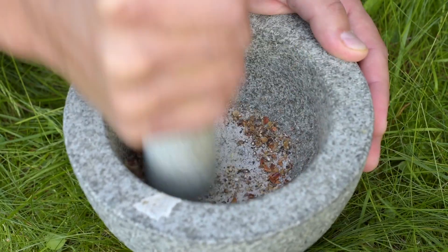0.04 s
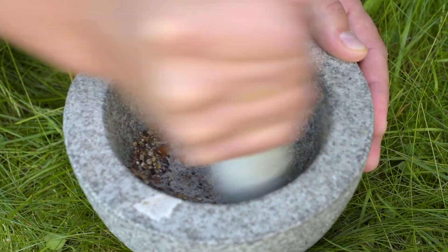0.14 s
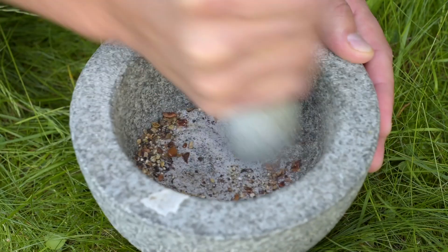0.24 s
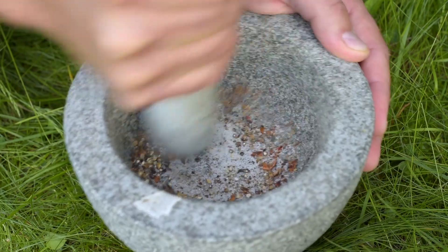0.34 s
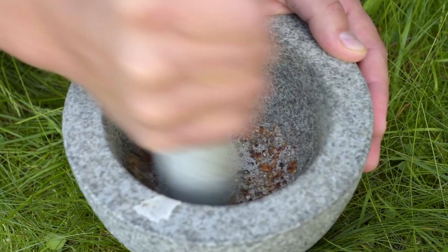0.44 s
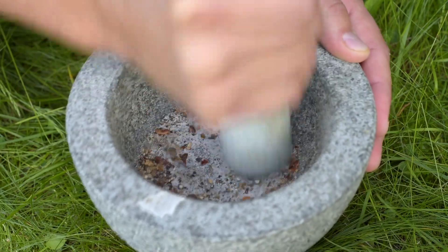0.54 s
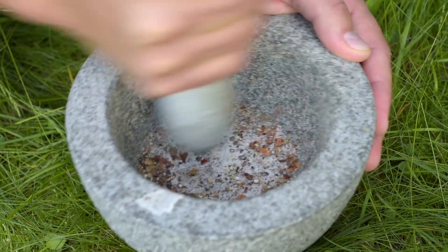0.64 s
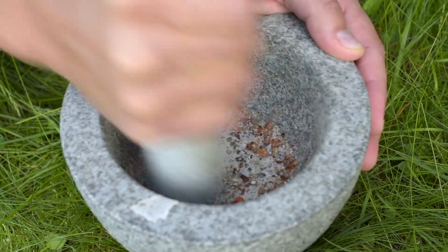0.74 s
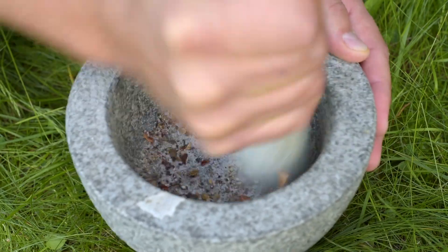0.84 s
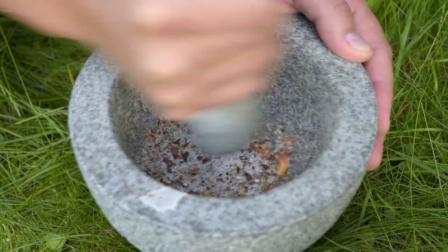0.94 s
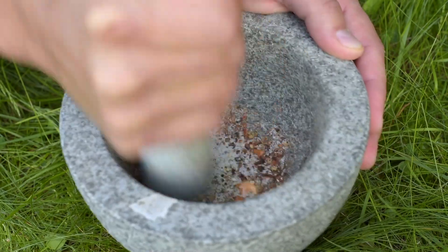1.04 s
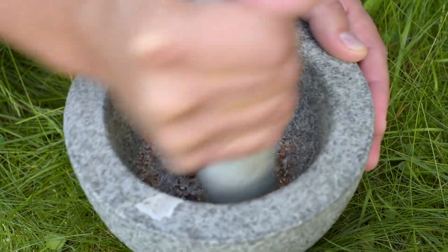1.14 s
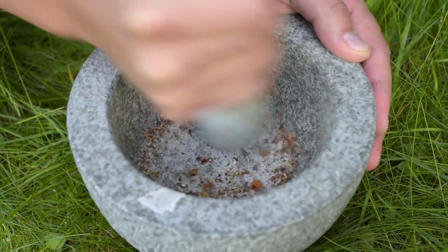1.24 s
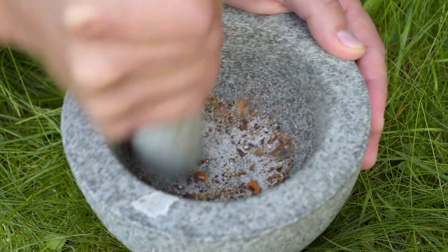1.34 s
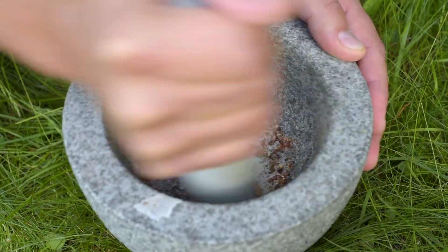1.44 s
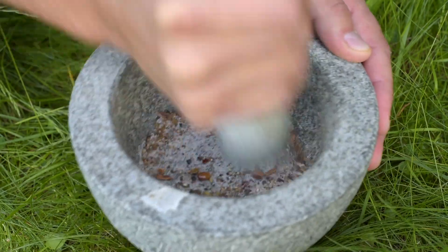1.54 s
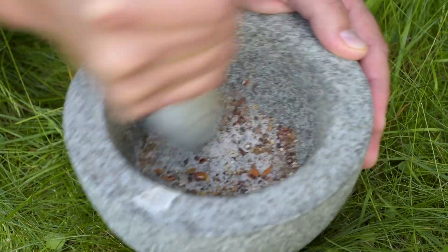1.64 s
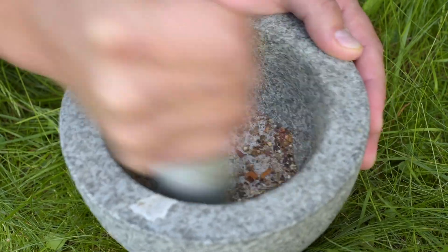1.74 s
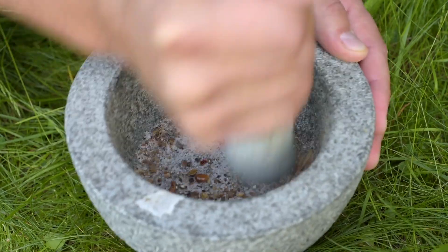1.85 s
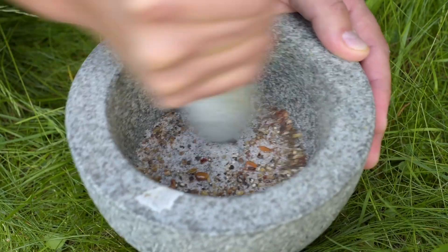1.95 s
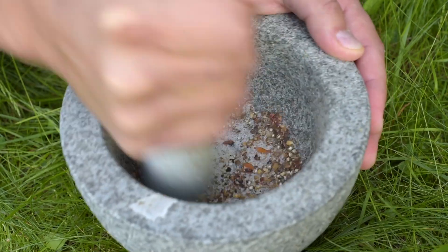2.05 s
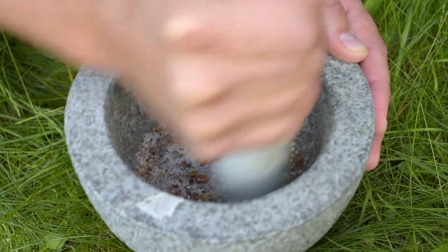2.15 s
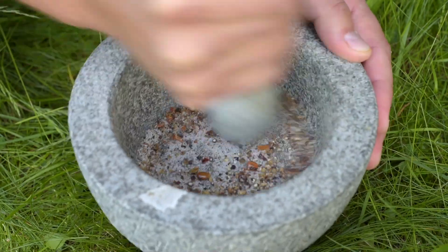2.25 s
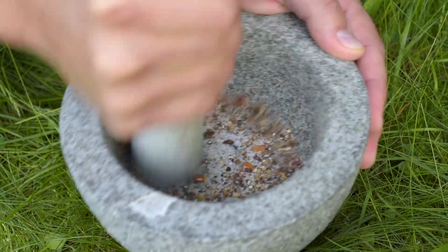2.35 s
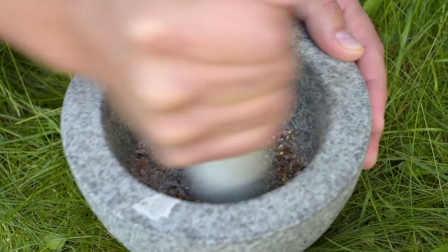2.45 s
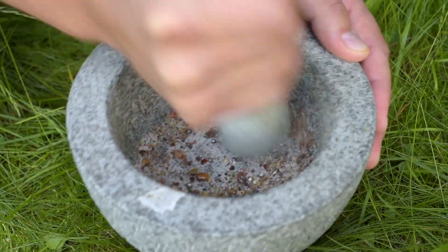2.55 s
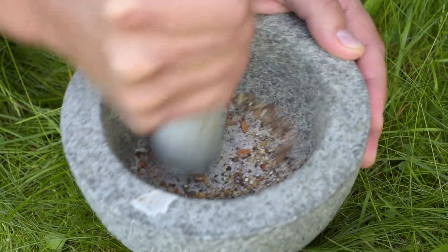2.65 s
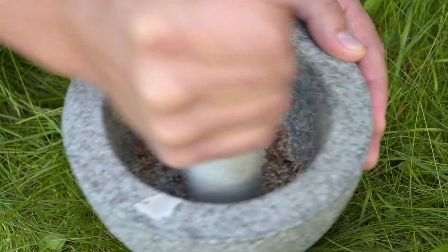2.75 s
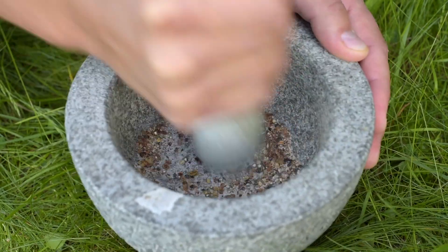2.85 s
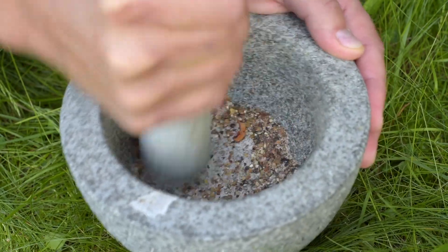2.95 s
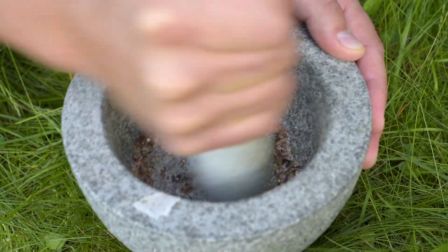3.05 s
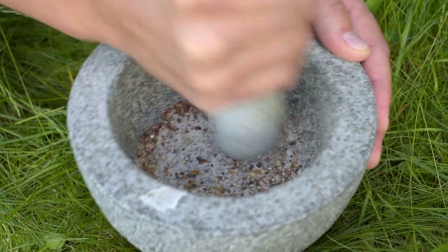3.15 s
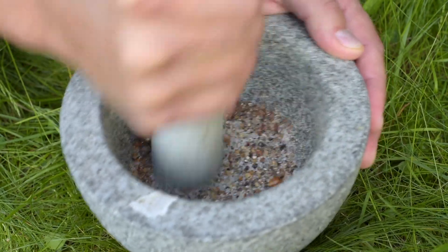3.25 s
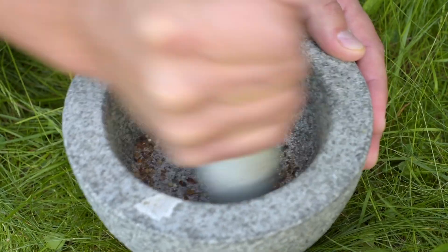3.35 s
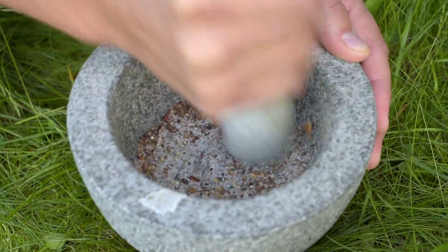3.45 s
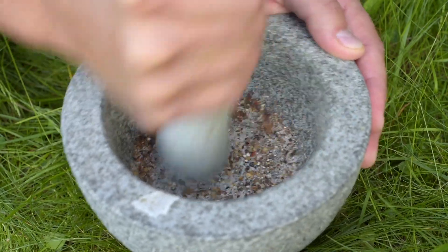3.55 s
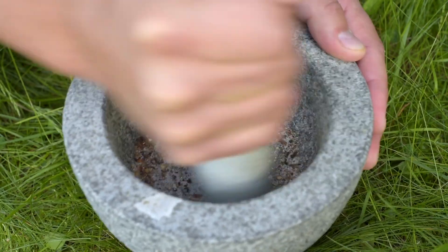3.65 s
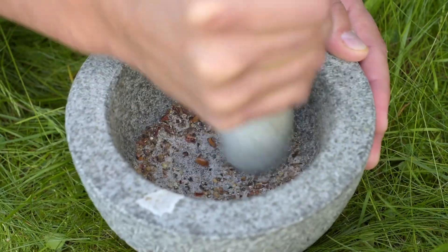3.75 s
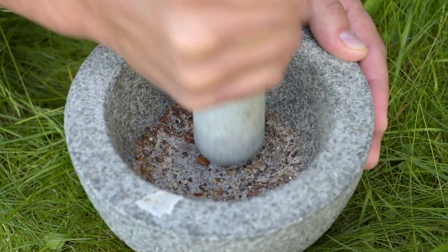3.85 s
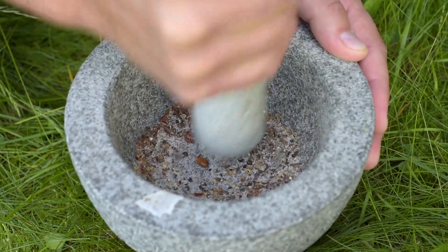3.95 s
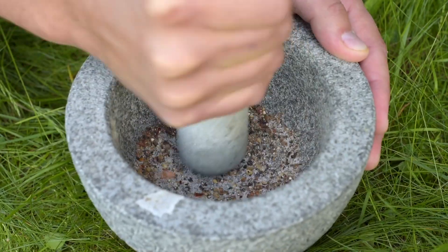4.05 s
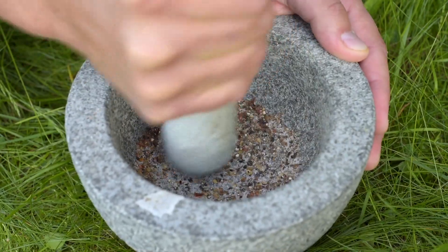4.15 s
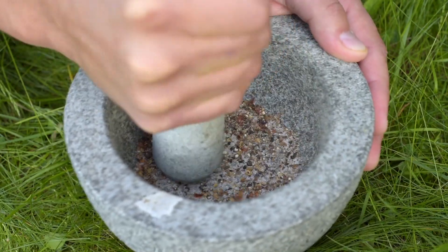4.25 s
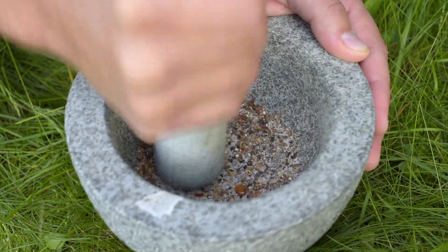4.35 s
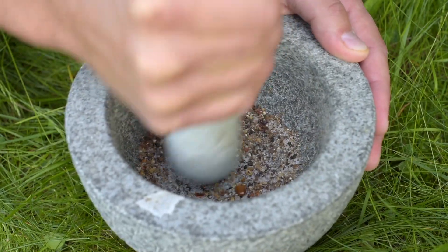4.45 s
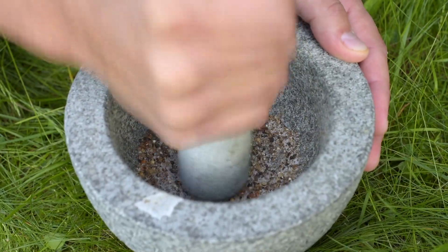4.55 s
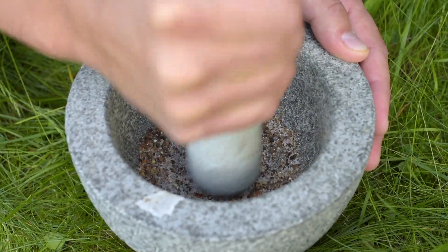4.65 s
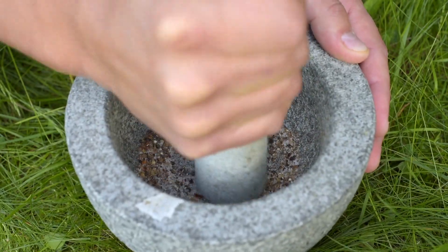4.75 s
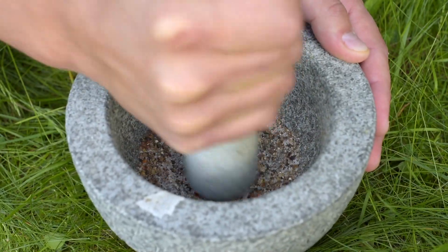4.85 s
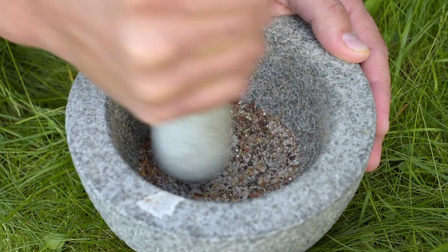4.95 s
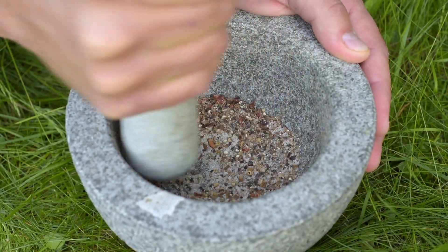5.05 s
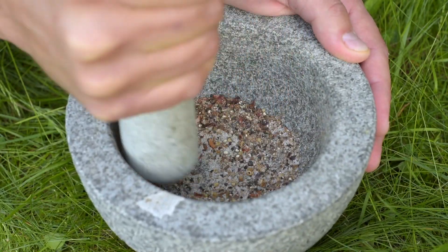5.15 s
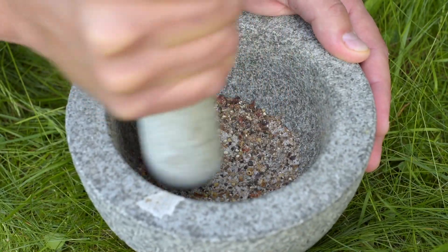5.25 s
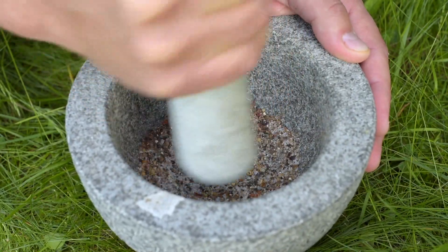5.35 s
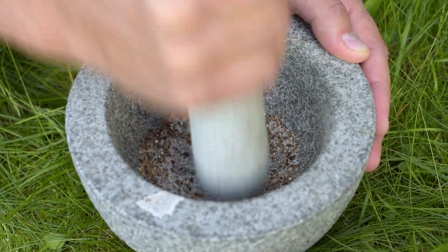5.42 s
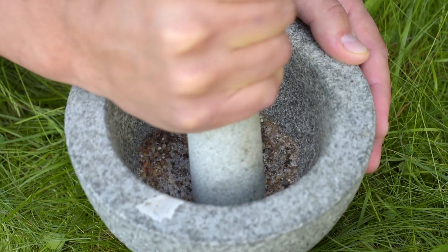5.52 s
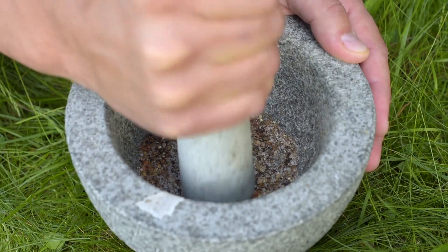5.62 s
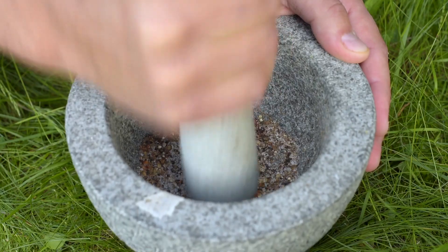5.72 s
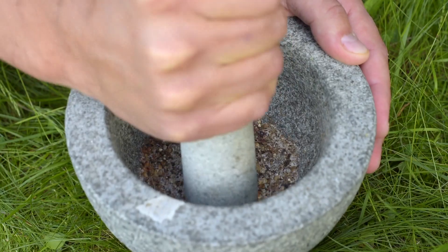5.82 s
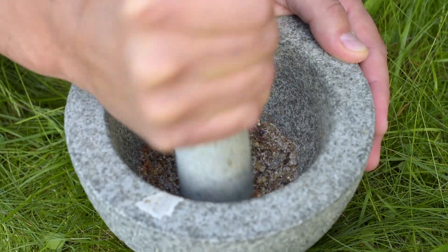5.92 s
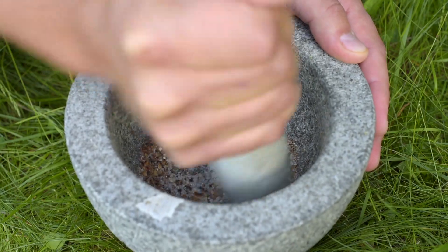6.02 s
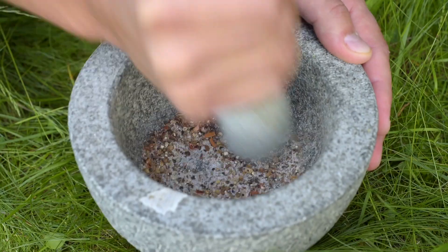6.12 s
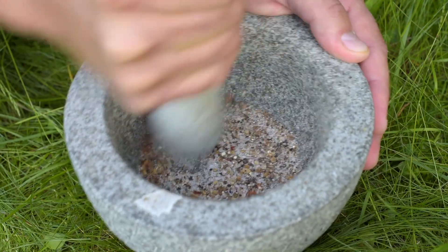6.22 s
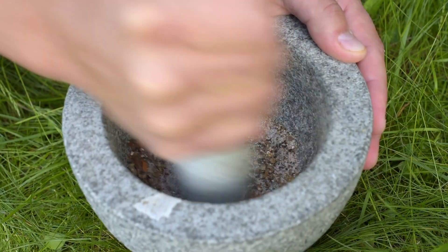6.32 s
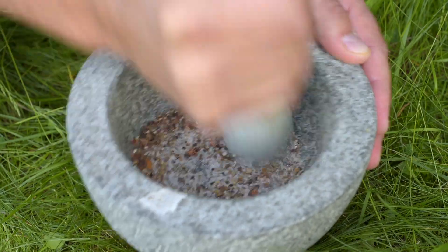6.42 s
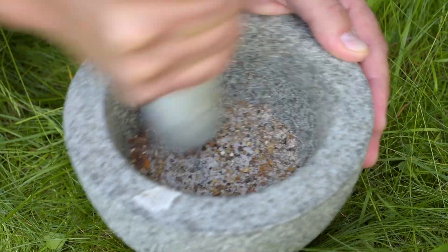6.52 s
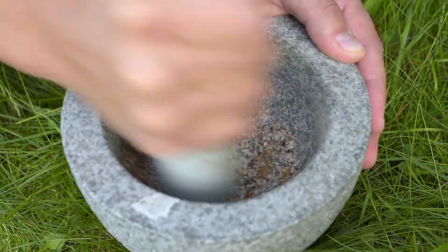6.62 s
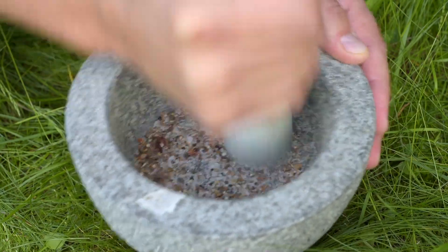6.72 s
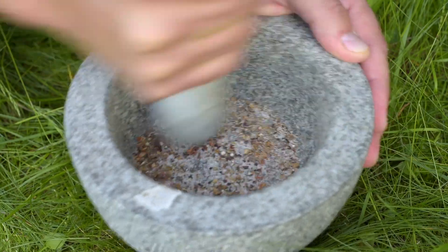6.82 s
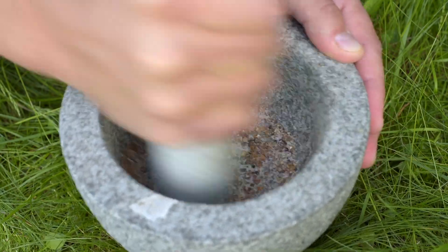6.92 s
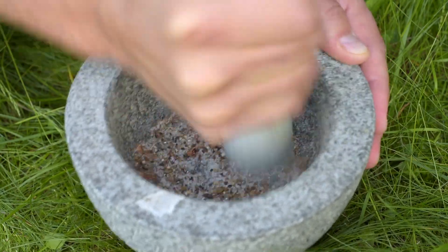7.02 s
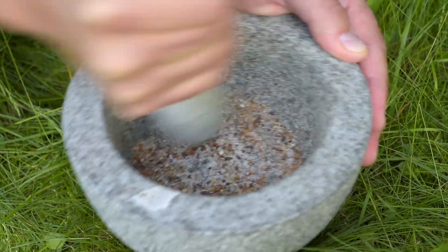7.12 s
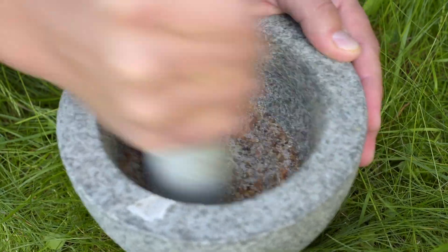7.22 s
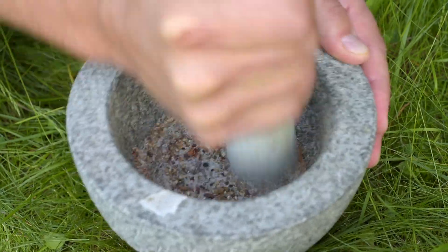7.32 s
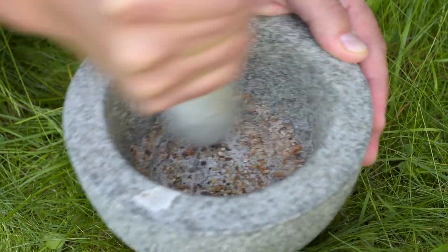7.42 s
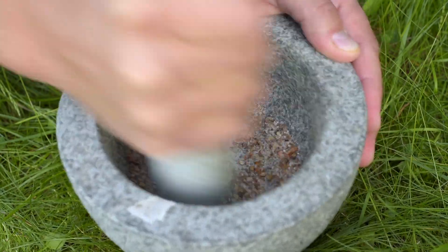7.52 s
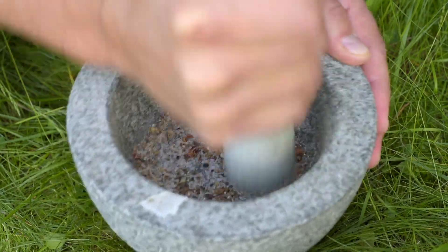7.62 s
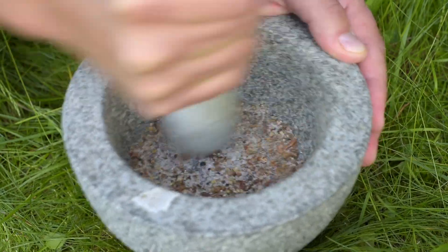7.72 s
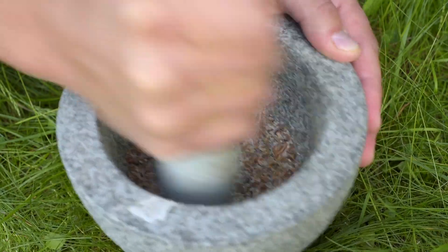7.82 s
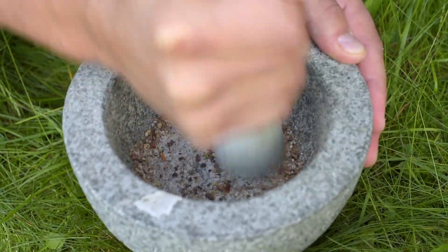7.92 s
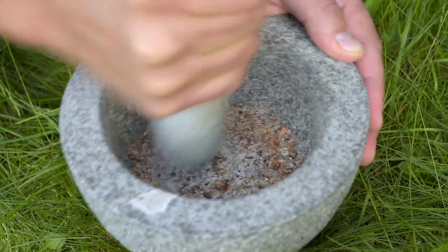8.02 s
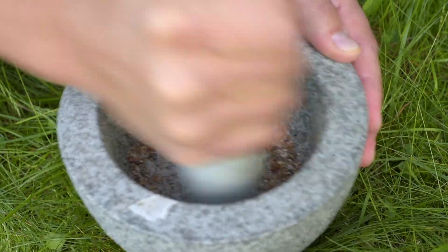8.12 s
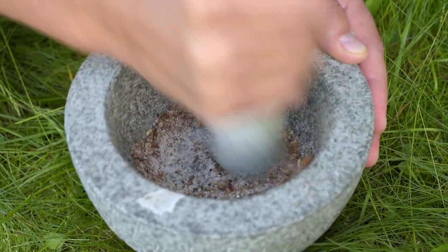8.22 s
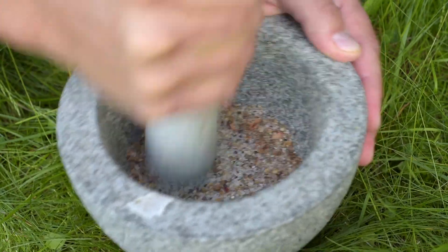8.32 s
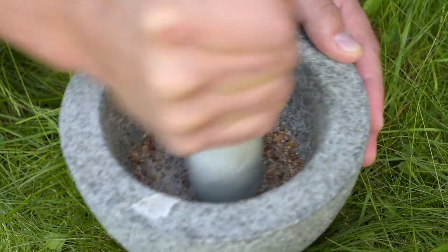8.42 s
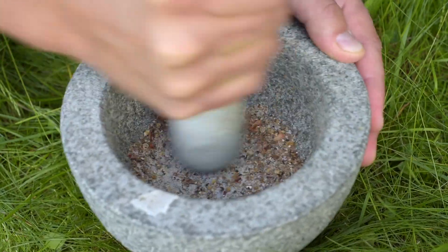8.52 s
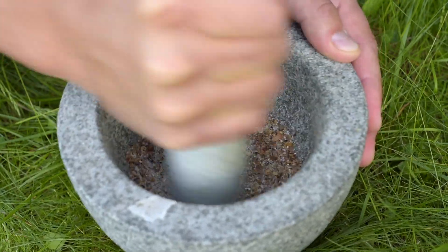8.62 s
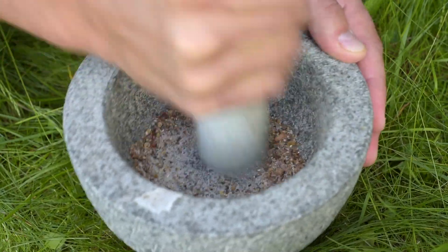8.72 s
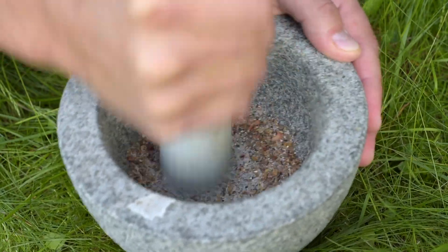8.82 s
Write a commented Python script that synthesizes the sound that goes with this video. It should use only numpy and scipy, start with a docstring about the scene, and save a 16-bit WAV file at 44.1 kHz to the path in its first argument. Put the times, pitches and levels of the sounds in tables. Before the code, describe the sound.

Very close, a granite pestle circles in a granite mortar, crushing coarse salt and seeds with gritty, rumbling, crackling strokes about three times a second. After almost four seconds the grinding stops for several separate hard stone knocks, some with a crisp seed crack. Then the circling returns, somewhat softer. Crickets chirp quietly throughout in a calm garden; dry sound, stone slightly left.

```python
"""A granite pestle circles in a granite mortar on a lawn, close by: rolling seeds rumble, breaking salt
hisses, friction sings, grains burst in fracture avalanches, and stone knocks ring as decaying modes.
Midway the grinding sinks and eight blows fall; under most a seed bursts just before stone meets stone.
Then the circling resumes. Throughout, crickets sing as trains of short falling tones, over noise-like
garden air, a narrow-band insect buzz and a faint high whine."""
import sys
import numpy as np
from scipy import signal
from scipy.fft import rfft, irfft, next_fast_len
from scipy.io import wavfile
from scipy.ndimage import uniform_filter1d, map_coordinates

SR = 44100
rng = np.random.default_rng(int(sys.argv[2]) if len(sys.argv) > 2 else 0)


def pcm_store(signal):
    """Save signal as 16-bit PCM."""
    levels = np.round(np.clip(np.atleast_2d(signal), -1, 1) * 32767)
    wavfile.write(sys.argv[1], SR, levels.astype(np.int16).T)


N = 391166

# spectrum of the garden air: (f/Hz, relative level/dB)
AIR_SPECTRUM = [(20, -24.5), (45, -1.5), (160, 0.5), (300, -10), (600, -18), (1200, -19.5), (2800, -25.5),
                (4500, -29), (6500, -21.5), (9000, -20.5), (12000, -25), (16000, -33.5)]
# spectrum of the blurred far crickets: (f/Hz, relative level/dB)
FAR_CRICKET_SPECTRUM = [(3500, -26.5), (4050, -15.5), (4350, -1), (4700, 2), (4950, -7.5), (5250, -11.5),
                        (5500, -16.5), (6500, -43), (12000, -91)]
# middle of one chirp, and the time to the next: the close low group, then the single higher cricket
CHIRP_AT_S, CHIRP_PERIOD_S = 4.04, .35
ANSWER_AT_S, ANSWER_PERIOD_S = 4.22, .333
# octave against the fundamental: trilling crickets, close chirping group, higher cricket
TRILL_OCTAVE_DB, NEAR_OCTAVE_DB, ANSWER_OCTAVE_DB = -31, -20, -34

# stereo likeness of the mortar before the level difference: (f/Hz, left-right correlation/1)
LIKENESS = [(100, 1), (900, 0.86), (2000, 0.62), (4500, 0.58), (8000, 0.12), (13000, 0.48)]
# level difference of the mortar between the ears: (f/Hz, left minus right level/dB)
LEFT_EXCESS = [(60, .5), (200, .8), (400, 3), (800, 6.2), (2000, 7), (5000, 7), (8000, 5.5), (13000, 2)]
# phase difference of the mortar: (f/Hz, angle by which left trails right/rad)
LEFT_LAG = [(60, -.1), (300, -0.2), (800, 0.8), (2400, 0.45), (3900, 0.5), (5400, 1.1), (7000, 1),
            (8500, 0.8), (12000, 2.4)]

# circles of the pestle: (start of push t/s, duration of push/s, then the relative
# level/dB of the seeds' rumble, of the salt's hiss and of the pestle's singing)
CIRCLES = [(-.03, 0.028, -31.5, -41.5, -38.5), (0.339, 0.036, -32.5, -32, -36.5),
           (0.683, 0.021, -29, -35, -40), (1.017, 0.042, -36, -33, -38), (1.285, 0.12, -35.5, -37.5, -35.5),
           (1.59, 0.17, -34.5, -32, -34.5), (1.95, 0.098, -35, -35, -38), (2.283, 0.17, -31.5, -31, -34),
           (2.588, 0.18, -37, -36, -38.5), (2.89, 0.11, -34, -33.5, -38.5), (3.167, 0.16, -35, -42, -42),
           (3.508, 0.09, -33, -34.5, -39.5), (3.785, 0.021, -40.5, -45, -45.5),
           (6.16, 0.15, -35.5, -38, -37.5), (6.486, 0.16, -34.5, -32, -35.5),
           (6.786, 0.099, -34, -35.5, -40), (7.071, 0.1, -30.5, -32, -37.5), (7.412, 0.11, -31, -32.5, -36),
           (7.732, 0.039, -29.5, -39, -39.5), (7.993, 0.12, -32.5, -35, -34.5),
           (8.268, 0.17, -36.5, -34.5, -39), (8.548, 0.19, -34.5, -61.5, -43.5),
           (8.755, 0.21, -42, -37.5, -45)]
# the pestle is down on the spices: (from t/s, to t/s)
GRIND_SPANS = [(-.1, 3.86), (6.076, 8.95)]
CONTACT_S, LIFTED_DB = 0.039, -17.5  # time to bear down or lift; grinding level when lifted
# the pestle sticks or skips: (middle t/s, duration/s, dip in level/dB)
STICKS = [(0.197, 0.043, 12), (0.581, 0.023, 12), (0.774, 0.015, 2.5), (0.992, 0.014, 19.5),
          (1.018, 0.0099, 11.5), (1.644, 0.0092, 8.5), (2.045, 0.078, 9), (2.342, 0.0067, 15.5),
          (2.472, 0.1, 7.5), (2.207, 0.0067, 13), (2.564, 0.05, 0.5), (2.597, .012, 3), (2.851, 0.033, 9),
          (2.971, 0.018, 8), (2.995, 0.0098, 7), (3.141, 0.051, 11), (3.272, 0.02, 8.5),
          (3.477, 0.026, 5.5), (3.778, 0.03, 5), (3.833, 0.012, 11), (6.128, 0.019, 4), (6.428, 0.042, 5.5),
          (6.737, 0.051, 4.5), (7.065, 0.032, 7.5), (7.127, 0.012, 6.5), (7.7, 0.027, 1.5),
          (7.823, 0.012, 2.5), (7.95, 0.017, 5.5), (8.482, 0.023, 11.5), (8.524, 0.013, 11.5),
          (8.738, 0.026, 8.5)]
# the pestle rides up before a sharp burst or a knock: how long, how deep the grinding dips
RIDE_S, RIDE_DB = 0.011, 4.5
SHARP_S = .016  # only bursts shorter than this lift the pestle
PUSH_ATTACK_S, PUSH_EASE_S = 0.023, 0.096  # time constants of the rumble's rise and ebb
ROLL_REST_DB = -11.5  # rumble left between pushes
# swell in a circle: half width, and place of the peak as a share of the push
CRUSH_WIDTH_S, CRUSH_PEAK = 0.32, 0.31
SING_WIDTH_S, SING_PEAK = 0.13, 0.78

# spectrum of seeds rolling on the bowl: (f/Hz, relative level/dB)
SEED_SPECTRUM = [(29, -50.5), (50, -15), (80, -14.5), (306, -6.5), (374, -13), (440, -9.5), (577, -11),
                 (780, -1.5), (905, 4.5), (1110, -6.5), (1300, -8), (2000, -10), (2300, -28), (2740, -28),
                 (3060, -13), (3800, -16.5), (4940, -12.5), (8360, -120)]
# spectrum of breaking salt: (f/Hz, relative level/dB)
SALT_SPECTRUM = [(300, -37.5), (1500, -5), (2600, -6.5), (3600, -1.5), (4600, -1.5), (6200, 0.5),
                 (7100, 1.5), (8100, 2.5), (9000, 0.5), (10200, 1), (12000, -3.5), (14000, -9),
                 (16000, -18.5)]
RUMBLE_TRIM_DB, HISS_TRIM_DB, SING_TRIM_DB = -0.37, -1.86, 2.5  # added to the circle levels
CRUSH_LIMIT_DB = 3.5  # how far the hiss's own slips can make it flare
# single crystals click in the hiss: rate, spread of sizes, level against the untrimmed hiss
SNAP_RATE_HZ, SNAP_SPREAD_DB, SNAP_DB = 190, 4, -8
SNAP_COLOUR_DB = 6  # spread of each crystal's own colour
# resonances of the wall, from lowest to highest: f/Hz
WALL_MODES = (1313, 1660, 1900)
WALL_DB, WALL_WIDTH_HZ = -8.5, 134  # against the mean of rumble and hiss in dB; resonance width

# bursts of seeds and salt crystals: (t/s, relative level/dB, duration before the decay/s,
# brightness as brittle against hard level/dB)
BURSTS = [(0.193, -26.5, .001, -12), (0.294, -28, .012, 19.5), (0.32, -25.5, 0.036, 20),
          (0.432, -25, 0.039, 2.5), (0.486, -23.5, 0.0097, -3.5), (0.496, -26, .001, -3),
          (0.539, -25, 0.011, 1), (0.625, -21.5, 0.0096, 3), (0.663, -24.5, 0.0078, -2.5),
          (0.696, -35.5, 0.0037, -17), (0.729, -24.5, 0.0145, -18), (0.743, -25.5, 0.01, -7),
          (0.757, -29, 0.0077, -15), (0.785, -19, 0.019, 6), (0.807, -11, 0.00042, 9),
          (0.825, -28, 0.03, 10), (0.873, -26, 0.026, -0.5), (0.918, -22.5, 0.013, 0),
          (1.007, -25, 0.0067, 12.5), (1.024, -18.5, 0.0067, 17), (1.09, -20, 0.0011, 4.5),
          (1.106, -19, 0.004, 7), (1.159, -22, .001, 5.5), (1.282, -18.5, 0.014, -0.5),
          (1.349, -19, .001, -6), (1.44, -21, .001, -9), (1.564, -28, 0.033, 10), (1.603, -25, 0.017, 13.5),
          (1.607, -22.5, 0.016, 10.5), (1.659, -22, 0.01, 3), (1.664, -20.5, .001, 2),
          (1.6805, -17, .0013, 4), (1.79, -22.5, 0.0094, 6), (1.938, -25.5, 0.064, 17),
          (2.063, -26, 0.0018, -3), (2.073, -18.5, 0.0061, 1), (2.13, -23, 0.00087, 7),
          (2.131, -32.5, 0.014, 8), (2.3566, -16, 0.00091, 4.5), (2.36, -22, 0.019, 2),
          (2.373, -16, .0012, 1.5), (2.394, -21.5, 0.005, 11), (2.604, -23.5, 0.011, -1.5),
          (2.611, -24, 0.022, 9), (2.64, -20, 0.017, 1), (2.74, -23.5, 0.035, 12.5),
          (2.8015, -22, 0.0012, 2.5), (2.871, -28, 0.029, 9), (2.9, -25.5, 0.049, 9.5),
          (2.982, -18.5, 0.003, -12), (2.999, -18, 0.0036, -20), (3.163, -29.5, .002, -9),
          (3.1905, -23.5, 0.018, 7), (3.1948, -22, .001, 0), (3.221, -27, 0.04, 8),
          (3.231, -22.5, 0.0012, 0), (3.281, -24.5, .0094, 6), (3.36, -28, 0.016, 5),
          (3.3693, -25, .001, 3), (3.384, -29.5, 0.022, 0), (3.394, -24, 0.00092, 0.5),
          (3.564, -27.5, 0.064, 14.5), (4.0695, -15.5, 0.0028, -4), (4.0697, -8.5, 0.0017, -10.5),
          (4.112, -24, 0.0014, 14), (4.241, -33.5, .0045, 18), (4.2692, -4.5, 0.0008, 3.5),
          (4.448, -32.5, 0.00402, -5.5), (4.6413, -14.5, 0.0031, 1.5), (4.687, -32.5, .0039, -1),
          (4.809, -31, 0.0039, 5.5), (4.83, -18.5, 0.0014, -2), (5.532, -6, 0.0033, 5),
          (5.675, -45, 0.013, 2), (5.822, -23, 0.0031, -2), (5.952, -41, .005, 0), (5.97, -42, .005, 2),
          (6.092, -26, 0.01, -23), (6.17, -26, 0.0097, 9), (6.2, -24.5, 0.0088, -1),
          (6.221, -20.5, 0.0069, 6), (6.282, -26.5, 0.075, 4), (6.332, -17.5, .001, 8),
          (6.343, -33, 0.00087, 1), (6.487, -21.5, 0.0065, 2.5), (6.636, -24.5, 0.011, 4.5),
          (6.779, -29.5, .008, -11), (6.902, -29.5, 0.018, -26), (6.919, -28, 0.064, 3.5),
          (7.005, -22, 0.0073, -3.5), (7.108, -30.5, 0.0072, 4.5), (7.136, -19, 0.0011, 8),
          (7.137, -25, .012, 5), (7.15, -24, 0.00053, 0.5), (7.173, -32.5, 0.16, -30),
          (7.402, -30, 0.057, 9), (7.461, -22, 0.0085, 2.5), (7.471, -29, .001, 1.5),
          (7.54, -24.5, 0.014, -4.5), (7.703, -27, 0.053, 10.5), (7.84, -25, 0.0059, 1),
          (7.972, -25.5, 0.063, 5), (8.029, -31, 0.017, 8), (8.102, -22.5, 0.0006, -9),
          (8.286, -26, 0.0056, 7.5), (8.494, -29.5, .014, -9), (8.544, -29.5, 0.013, 5),
          (8.664, -34, 0.011, -3), (8.689, -24, .0008, -4)]
# smaller grains snap at random: rate, level against the hiss, length before its random factor
CRUMB_RATE_HZ, CRUMB_DB, CRUMB_S = 64, -4, 0.0019
BURST_TRIM_DB = -3.5  # added to all bursts, small ones too
CRACK_GROWTH, CRACK_RISE = 0.33, 0.24  # share of force that builds up; its time constant over the length
CRUNCH_DB = 1.7  # how jerkily a grain gives way

# stone meets stone: (t/s, relative level/dB, bowl pitch f/Hz, thud level/dB,
# clack level/dB, clack centre f/Hz, ping level/dB); the last three levels are against the bowl modes
STONE_KNOCKS = [(0.3668, -19, 935, -11, -6, 1350, -25), (0.669, -16, 980, -20, -2.5, 1780, -20),
                (0.744, -19.5, 930, -19, -3, 1600, -20), (0.9581, -2, 960, -13.5, 2.5, 1720, 2.5),
                (0.9654, -0.5, 926, -17, -1.5, 1480, -9.5), (1.034, -15, 930, -9, -11, 1350, -30),
                (1.293, -18.5, 910, -12, -4, 1600, -16), (1.382, -18.5, 980, -14, -15, 1350, -20),
                (1.6619, -13, 920, -14, -1.5, 1580, -5), (1.683, -24, 920, -18, 1, 1600, -15),
                (2.3543, -15, 910, -11, -7, 1670, -16), (2.379, -21.5, 930, -20, 0, 1900, 8.5),
                (2.957, -23.5, 845, -21, 6.5, 1430, -12), (2.9811, -17, 920, -19, -12, 1500, -18),
                (3.0031, -23.5, 880, -25, -11, 1700, 8), (3.198, -23.5, 870, -4, 5, 1610, 3),
                (3.286, -20, 910, -19, -3, 1590, -14), (3.323, -27, 950, -24, -2, 1500, -14),
                (3.607, -22, 920, -20, -14, 1600, -16), (3.701, -25.5, 880, -21, 4.5, 1650, -18),
                (3.8533, -24, 926, -32, -0.5, 1510, -2), (4.072, -4.5, 913, -6, -12.5, 1300, -33),
                (4.2678, -10, 890, -21, -6, 1340, -30), (4.2735, -3, 920, -10.5, -9, 1450, -15),
                (4.45, -13.5, 907, -5.5, -5, 1690, -8), (4.6425, 3, 900, -13, -8.5, 1520, -17),
                (4.8302, 1, 876, -13.5, -8.5, 1580, -29), (5.162, -10.5, 950, -54, 1.5, 1400, -4),
                (5.1814, -20, 925, -35, -3, 1350, -13), (5.191, -23.5, 910, -37, -9, 1330, -20),
                (5.5354, -0.5, 883, -15, -10.5, 1800, -42), (5.825, 2, 876, -15, -3.5, 2030, -23),
                (6.225, -14, 920, -14, -3.5, 1690, -17), (6.4649, -19, 880, -11, -2, 1700, -14),
                (6.48, -16, 880, -16, -8, 1600, -18), (6.5193, -17.5, 910, -10, -0.5, 1560, -22),
                (6.7832, -18.5, 860, -9, -25, 1600, -25), (7.4244, -18, 970, -30, -6, 1400, -17),
                (7.475, -17.5, 910, -13, -4, 1600, -18), (7.577, -33, 880, -19, 14, 1600, -18),
                (7.768, -13, 930, -20, -6.5, 1590, -18), (8.276, -21, 870, -6, 0.5, 1620, -9),
                (8.4963, -21, 870, -29, -13, 1600, -20)]
# modes of mortar and pestle: (f/Hz, relative level/dB, decay time t60/s);
# those below 1170 Hz shift with the bowl pitch
STONE_MODES = [(64, -23, 0.12), (137, -17.5, 0.0636), (274.5, -5, 0.018), (446, 4, 0.013), (550, -8, 0.011),
               (689, -4, 0.013), (891, -3, 0.026), (1215, 0.5, 0.0079), (1613, -11, 0.014),
               (1920, -8.5, 0.012), (2210, -9.5, 0.0072), (2535, -15, 0.026), (3070, -4.5, 0.0053),
               (3435, -9, 0.014), (4064, -11, 0.04), (4860, -34, 0.016), (5690, -16, 0.023),
               (7100, -24.5, .02)]
BOWL_HZ = 895  # bowl pitch at which the modes are unshifted
SHOVE_DB = -7.5  # gain of the dull push of the whole bowl against the level of a blow
# weighting of wall modes around the clack: width in log pitch, focus, gain at the centre
CLACK_WIDTH, CLACK_FOCUS_DB, CLACK_DB = 0.17, 9, 5.5
# the pestle chatters over bare stone: (t/s, duration/s, relative level/dB, brightness/dB)
STONE_SCRAPES = [(0.233, .04, -22, 3), (0.383, .02, -24, -8), (1.054, .03, -33, -11.5),
                 (1.322, .025, -24.5, 0), (1.986, .012, -26, 6), (2.702, .016, -27, -13),
                 (2.931, .01, -21.5, 0), (3.006, 0.011, -40.5, 16), (3.835, .022, -30.5, 1),
                 (6.093, .008, -41.5, 13.5), (7.418, .02, -22, 1.5), (7.744, .03, -28, 0),
                 (8.06, .06, -29, -9), (8.37, .06, -29, -13), (8.311, .035, -21.5, -3),
                 (8.675, .02, -36.5, 14)]
CHATTER_S, CHATTER_DB = 0.0055, 1  # mean time between touches of a scrape; their spread in level
TICK_RATE_HZ, TICK_DB = 5.8, 4.5  # chance touches: rate, level against the rumble
TOUCH_THUD_DB, TICK_BRIGHT_DB = -11.5, -2.5  # light touches have a weak thud
TOUCH_SPREAD_HZ, TOUCH_CLACK_HZ = 13, 1760  # spread of bowl pitch; middle of the clacks
HIGH_MODES_DB, HIGH_MODES_GROW = -6.5, 1.1  # ping of light touches: offset, slope against the clack

TOP_HZ = 16100  # upper band limit


def amp(db):
    """Level law: decibels to an amplitude ratio."""
    return 10 ** (np.asarray(db) / 20)


def unit(x):
    """Normalisation: x scaled to a root mean square of 1."""
    return x / np.sqrt(np.mean(x ** 2) + 1e-20)


def along(points, hz):
    """Interpolation of (f/Hz, value) points on a logarithmic frequency axis."""
    f, v = np.transpose(points)
    return np.interp(np.log(hz + 1), np.log(f + 1), v)


def wobble(rate):
    """Slow random modulation: a smooth curve through rate random knots a second."""
    knots = rng.standard_normal(int(N * rate / SR) + 4)
    return map_coordinates(knots, [np.arange(N) * rate / SR])


def add(track, s, x):
    """Superposition: mix x into the track from time s on."""
    start = max(round(s * SR), 0)
    part = track[..., start:start + x.shape[-1]]
    part += x[..., :part.shape[-1]]


def filtered(x, response):
    """Linear filtering: multiply the spectrum by a complex response of frequency."""
    m = next_fast_len(N + 8192, True)
    return irfft(rfft(x, m) * response(np.fft.rfftfreq(m, 1 / SR)), m)[..., :N]


def resonance(f, centre_hz, width_hz):
    """Damped oscillator: a causal resonance of peak gain 1."""
    return 1j * f * width_hz / (centre_hz ** 2 - f ** 2 + 1j * f * width_hz)


def background():
    """Filtered noise: quiet garden air and a thin distant insect buzz, with a faint pure-tone whine."""
    noise = rng.standard_normal((2, N)) * 0.04 + rng.standard_normal(N)
    air = unit(filtered(noise, lambda hz: amp(along(AIR_SPECTRUM, hz))))
    breeze_db = .5 * wobble(1.6)
    buzz = unit(filtered(rng.standard_normal((2, N)), lambda hz: resonance(hz, 8242, 70)))
    whine = amp(-65) * np.sin(2 * np.pi * 15735 * np.arange(N) / SR)
    return amp(-51.0 + breeze_db) * air + amp(-59.0) * buzz + whine


def wing_strokes(count, length, centre_hz, spread_hz, fall_hz, octave_db, left_db):
    """Stridulation: a train of short falling tones, each with a faint octave, at rms 1."""
    song = np.zeros((2, N))
    u = np.linspace(0, 1, int(length * SR))
    for k, (early, pitch, size, pan, delay) in enumerate(rng.standard_normal((count, 5))):
        hz = centre_hz + spread_hz * np.clip(pitch, -2, 2) + fall_hz * (.5 - u)
        # the right channel has a random phase offset
        phase = 2 * np.pi * np.cumsum(hz) / SR + np.array([[0], [1.54 * delay]])
        stroke = np.sin(np.pi * u) * (np.sin(phase) + amp(octave_db) * np.sin(2 * phase))
        start_s = (k - 0.15 * early) / count * N / SR
        stereo_db = (left_db + 1.6 * pan) * np.array([[.5], [-.5]])
        add(song, start_s, amp(2.7 * size + stereo_db) * stroke)
    return unit(song)


def chirp_beat(at_s, period_s):
    """Amplitude modulation: one rounded swell in each period, silence between."""
    t = np.arange(N) / SR
    return np.sqrt(np.maximum(np.cos(2 * np.pi * (t - at_s) / period_s), 0))


def crickets():
    """Superposed stridulation: far shimmer, nearer trill, a close low group and one higher cricket chirping."""
    voices = rng.standard_normal((2, N)) + 0.44 * rng.standard_normal(N)
    far = unit(filtered(voices, lambda hz: amp(along(FAR_CRICKET_SPECTRUM, hz))) * amp([[3.5], [-3.5]]))
    trill = wing_strokes(count=3200, length=0.014, centre_hz=4703, spread_hz=143, fall_hz=190,
                         octave_db=TRILL_OCTAVE_DB, left_db=9.5)
    near = wing_strokes(count=1400, length=0.0198, centre_hz=4527, spread_hz=135, fall_hz=286,
                        octave_db=NEAR_OCTAVE_DB, left_db=6.5)
    answer = wing_strokes(count=330, length=.02, centre_hz=5150, spread_hz=48, fall_hz=230,
                          octave_db=ANSWER_OCTAVE_DB, left_db=9)
    near_chirps = amp(-37 + 0.45 * wobble(2.74)) * chirp_beat(CHIRP_AT_S, CHIRP_PERIOD_S) * near
    answer_chirps = amp(-45.0 + wobble(2.4)) * chirp_beat(ANSWER_AT_S, ANSWER_PERIOD_S) * answer
    return amp(-41.0) * far + amp(-42.5) * trill + near_chirps + answer_chirps


def contact_db():
    """Contact force: the pestle bears down while grinding, save where it sticks, skips or rides up."""
    t = np.arange(0, N / SR, .001)
    down = sum(np.clip(np.minimum(t - start, stop - t) / CONTACT_S + 1, 0, 1)
               for start, stop in GRIND_SPANS)
    sharp_bursts = [burst for burst in BURSTS if burst[2] < SHARP_S]
    rides = [(row[0] - RIDE_S / 2, RIDE_S, RIDE_DB) for row in STONE_KNOCKS + sharp_bursts]
    # flat-bottomed dips, half as deep at the ends of their stated duration
    dips = [depth / (1 + (2 * (t - s) / length) ** 8) for s, length, depth in STICKS + rides]
    return np.interp(np.arange(N) / SR, t, LIFTED_DB * (1 - down) - np.max(dips, axis=0))


def circling():
    """Periodic drive: levels in dB of the rumble, hiss and singing as each push rises and ebbs."""
    t = np.arange(0, N / SR, .002)
    start, hold, rumble_db, hiss_db, sing_db = np.transpose(CIRCLES)[:, :, None]
    since = t - start
    push = np.exp(np.minimum(since, 0) / PUSH_ATTACK_S - np.maximum(since - hold, 0) / PUSH_EASE_S)

    def swell(width, place):
        near_push = np.abs(since - hold / 2) < .5
        return near_push / (1 + ((since - place * hold) / width) ** 2)

    crush = swell(CRUSH_WIDTH_S, CRUSH_PEAK)
    rumble = amp(rumble_db) * np.maximum(push, amp(ROLL_REST_DB) * np.sqrt(crush))
    hiss = amp(hiss_db) * crush
    sing = amp(sing_db) * swell(SING_WIDTH_S, SING_PEAK)
    contact = contact_db()
    # the circles overlap and add in power
    return [np.interp(np.arange(N) / SR, t, 10 * np.log10(np.sum(turns ** 2, 0) + 1e-12)) + contact
            for turns in (rumble, hiss, sing)]


def fractures(rate, spread_db):
    """Shot noise: two channels of tiny snaps of unequal size, rate a second."""
    snaps = rng.random(N) < rate / SR
    sizes = amp(spread_db * np.clip(rng.standard_normal(N), -3, 1.6))
    return unit(snaps * sizes * rng.standard_normal((2, N)))


def slips(rate, relax):
    """Stick-slip: sudden jerks, rate a second, each relaxing exponentially; mean 0, rms 1."""
    kicks = (rng.random(N) < rate / SR) * rng.uniform(0.83, 1, N)
    jerks = signal.lfilter([1], [1, -np.exp(-1 / (relax * SR))], kicks)
    return unit(jerks - jerks.mean())


def mottled(pair, depth_db, size):
    """Spectral modulation: a random time-frequency pattern gives the grains changing colours."""
    z = signal.stft(pair, nperseg=256)[2]
    field = uniform_filter1d(rng.standard_normal(z.shape[1:]), size, axis=0)
    field = uniform_filter1d(field, size=7, axis=1)
    return signal.istft(z * amp(depth_db * unit(field)), nperseg=256)[1][:, :N]


def from_bowl(pair, colour):
    """Stereo coherence: colour two unrelated signals, alike in the bass, louder left, at mid rms 1."""
    def response(hz):
        turn = np.arccos(np.clip(along(LIKENESS, hz), -1, 1)) / 2
        return colour(hz) * np.array([np.cos(turn), np.sin(turn)])

    def lean(hz):
        return amp(along(LEFT_EXCESS, hz) * np.array([[.5], [-.5]]))

    mid, side = filtered(pair, response)
    out = filtered(np.array([mid + side, mid - side]), lean)
    return out / np.sqrt(np.mean(out.mean(0) ** 2))


def salt_colour(hz):
    """Fracture spectrum: the colour of breaking salt."""
    return amp(along(SALT_SPECTRUM, hz))


def wall(level_db):
    """Moving excitation: in half a circle scraping passes from the lowest wall resonance to the highest."""
    starts = np.transpose(CIRCLES)[0]
    place = np.interp(np.arange(N) / SR, starts, np.arange(len(starts))) % 1
    # it stays near the highest resonance for the rest of the circle
    step = (len(WALL_MODES) - 1) * np.minimum(2 * place, 1) + .25 * wobble(9)
    out = np.zeros((2, N))
    for k, centre_hz in enumerate(WALL_MODES):
        def mode(hz):
            return resonance(hz, centre_hz, WALL_WIDTH_HZ) * resonance(hz, centre_hz, centre_hz)
        ring = from_bowl(fractures(rate=1500, spread_db=5.5), mode)
        out += np.exp(-np.square(step - k)) * ring
    return amp(level_db + WALL_DB) * out


def grinding(rumble_db, hiss_db, sing_db):
    """Stick-slip friction: seeds shake the bowl, salt breaks into hiss and the pestle's resonances sing."""
    # the layers jerk together as the pestle catches on the grains; some also jerk on their own
    catch_db = 1.1 * slips(rate=100, relax=0.011)
    roll_db = 0.46 * slips(rate=78, relax=0.0016)
    crush_db = np.minimum(0.9 * slips(rate=320, relax=0.014), CRUSH_LIMIT_DB)

    seeds = mottled(fractures(rate=3000, spread_db=2.0), depth_db=2.5, size=3)
    rumble = from_bowl(seeds, lambda hz: amp(along(SEED_SPECTRUM, hz)))
    rumble *= amp(rumble_db + RUMBLE_TRIM_DB + catch_db + roll_db)

    salt = mottled(fractures(rate=10000, spread_db=2.0), depth_db=3, size=11)
    hiss = from_bowl(salt, salt_colour) * amp(hiss_db + HISS_TRIM_DB + catch_db + crush_db)

    def pestle(hz):
        main = resonance(hz, 5675, 260) * resonance(hz, 5000, 1200)
        lower = resonance(hz, 4720, 449) * resonance(hz, 4900, 1200)
        return main + 0.12 * lower

    sing = from_bowl(fractures(rate=5100, spread_db=-2.0), pestle)
    sing *= amp(sing_db + SING_TRIM_DB + catch_db + 3.5 * wobble(40))

    crystals = mottled(fractures(SNAP_RATE_HZ, SNAP_SPREAD_DB), depth_db=SNAP_COLOUR_DB, size=9)
    clicks = from_bowl(crystals, salt_colour) * amp(hiss_db + SNAP_DB + catch_db)
    scraping = wall((rumble_db + hiss_db) / 2 + catch_db + roll_db)
    return rumble + scraping + hiss + sing + clicks


def cracking(hiss_db):
    """Fracture avalanche: bursting grains swell; hard ones ring the pestle, brittle ones fizz higher up."""
    force = np.zeros((2, N))  # hard, brittle
    t = np.arange(SR // 6) / SR
    crumbs = [(i / SR, hiss_db[i] + CRUMB_DB, CRUMB_S * rng.uniform(0.24, 3.0), 5 * rng.standard_normal())
              for i in np.flatnonzero(rng.random(N) < CRUMB_RATE_HZ / SR)]
    for s, db, length, bright_db in BURSTS + crumbs:
        after = np.maximum(t - length, 0)
        decay = amp(-60 * after / 0.0076) + amp(-23 - 60 * after / 0.11)  # fast, then a faint tail
        growth = 1 - CRACK_GROWTH * np.exp(-t / (CRACK_RISE * length))
        share = np.array([[1], [amp(bright_db)]]) / np.hypot(1, amp(bright_db))
        add(force, s, amp(db + BURST_TRIM_DB) * share * growth * decay)

    def hard(hz):
        body = resonance(hz, 5160, 2550) * (1 + 1.4 * resonance(hz, 5610, 400))
        return body + .5 * resonance(hz, 7600, 300)

    def brittle(hz):
        high_pass = (hz / np.hypot(hz, 5200)) ** 3
        return salt_colour(hz) * high_pass * (1 + 1.1 * resonance(hz, 7120, 300))

    def snaps(colour):
        return from_bowl(mottled(fractures(rate=9900, spread_db=0.0), depth_db=1.0, size=7), colour)

    crunch = amp(CRUNCH_DB * slips(rate=760, relax=0.0039))
    return crunch * (force[0] * snaps(hard) + force[1] * snaps(brittle))


def touches(rumble_db):
    """Intermittent contact: scrapes as uneven rows of light knocks, and stray ticks; rows as STONE_KNOCKS."""
    hits = []
    for s, length, db, bright_db in STONE_SCRAPES:
        for k in range(int(length / CHATTER_S) + 1):
            touch_s = s + (k + .5 * rng.uniform(-1, 1)) * CHATTER_S
            hits.append((touch_s, db + CHATTER_DB * rng.standard_normal(), bright_db))
    for i in np.flatnonzero(rng.random(N) < TICK_RATE_HZ / SR):
        hits.append((i / SR, rumble_db[i] + TICK_DB, TICK_BRIGHT_DB))
    rows = []
    for s, db, bright_db in hits:
        bowl_hz = BOWL_HZ + TOUCH_SPREAD_HZ * rng.standard_normal()
        clack_hz = TOUCH_CLACK_HZ * np.exp(CLACK_WIDTH * rng.standard_normal())
        ping_db = HIGH_MODES_DB + HIGH_MODES_GROW * bright_db
        rows.append((s, db, bowl_hz, TOUCH_THUD_DB, bright_db, clack_hz, ping_db))
    return rows


def knocking(blows):
    """Modal synthesis: each blow rings the stone as decaying sines, weighted into thud, bowl, clack and ping."""
    out = np.zeros((2, N))
    t = np.arange(SR // 8) / SR
    hz, level, t60 = np.transpose(STONE_MODES)[:, :, None]
    # neighbouring modes swing in opposite senses, and each is louder on the left
    sense = (-1) ** np.arange(len(STONE_MODES))
    lean = sense * amp(along(LEFT_EXCESS, hz) * np.array([.5, -.5])).T
    # the whole bowl is also shoved down once: a dull pulse with no ring
    u = t / 0.00033
    shove = amp(SHOVE_DB) * u * np.exp(-u)
    onset = 1 - np.exp(-t / 0.00032)
    for s, db, bowl_hz, thud_db, clack_db, clack_hz, ping_db in blows:
        nearness = np.exp(-.5 * (np.log(hz / clack_hz) / CLACK_WIDTH) ** 2)
        wall_db = clack_db + CLACK_DB + CLACK_FOCUS_DB * (nearness - 1)
        touch_db = np.select([hz < 620, hz < 1170, hz < 2300], [thud_db, 0, wall_db], ping_db)
        # the place of the pestle shifts the low resonances and changes the strength of each mode
        pitch = np.where(hz < 1170, hz * bowl_hz / BOWL_HZ, hz)
        chance_db = .9 * rng.standard_normal(hz.shape)
        gain = amp(level + touch_db + chance_db - 60 * t / t60)
        ring = lean @ (gain * np.sin(2 * np.pi * pitch * t) * onset)
        add(out, s, amp(db) * (ring + shove))
    return out


def scene():
    """Superposition and interaural phase: garden plus mortar, whose left channel mostly trails the right."""
    garden = background() + crickets()
    rumble_db, hiss_db, sing_db = circling()
    mortar = grinding(rumble_db, hiss_db, sing_db) + cracking(hiss_db)
    mortar += knocking(touches(rumble_db)) + knocking(STONE_KNOCKS)

    def lag(hz):
        return np.exp(1j * along(LEFT_LAG, hz) * np.array([[-.5], [.5]]))

    return filtered(mortar, lag) + garden


def record(dry):
    """Saturation and band limitation: peaks near full scale flatten, and nothing passes above TOP_HZ."""
    clipped = dry / (1 + np.abs(dry) ** 8) ** (1 / 8)
    return filtered(clipped, lambda hz: hz < TOP_HZ)


dry = scene()
out = record(dry)
pcm_store(out)
```